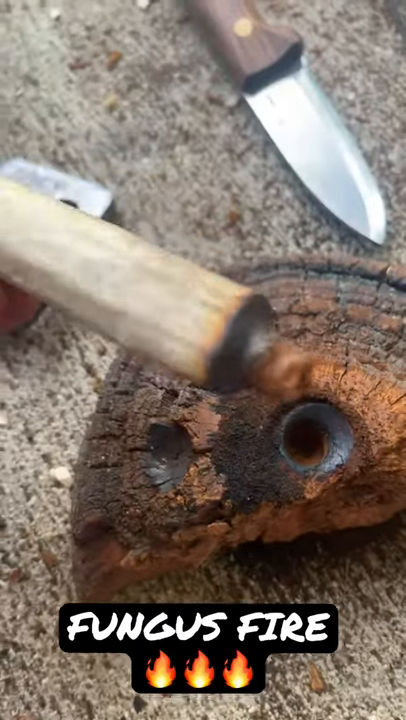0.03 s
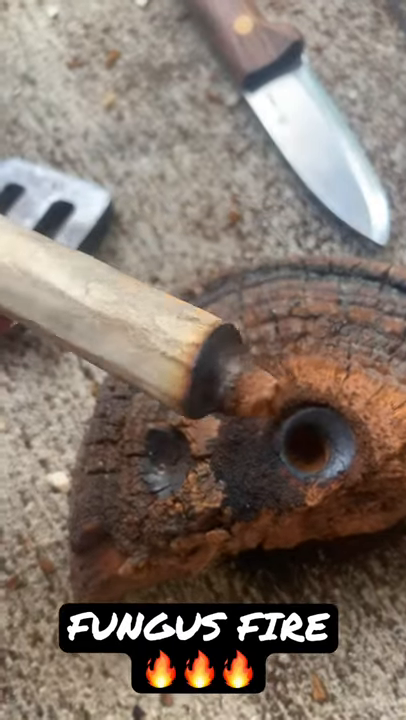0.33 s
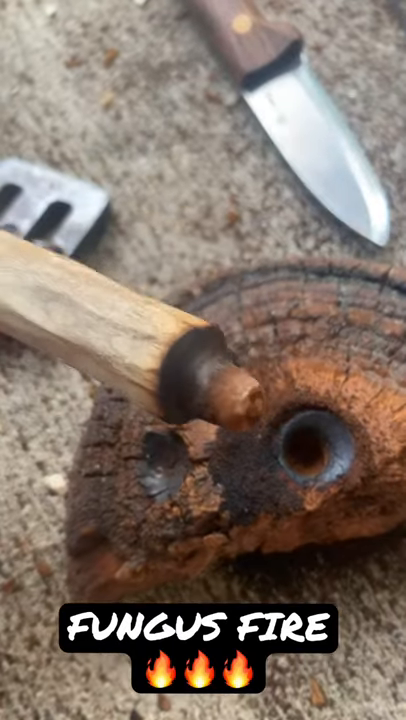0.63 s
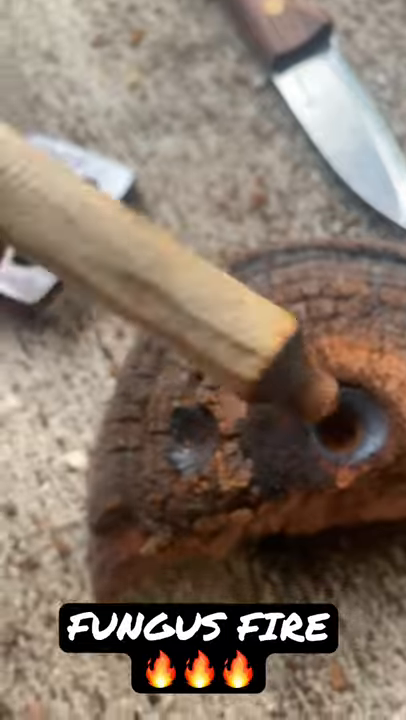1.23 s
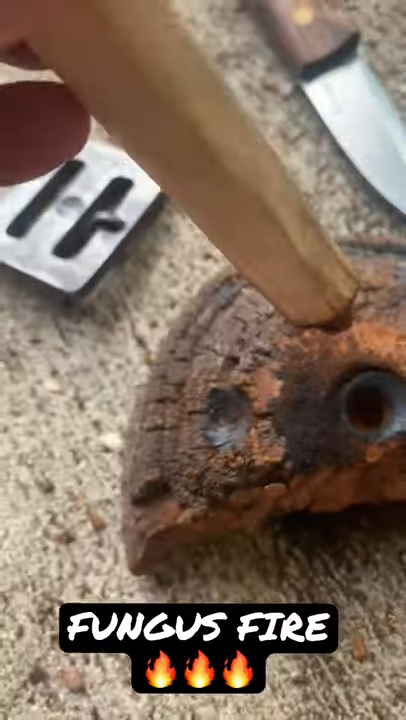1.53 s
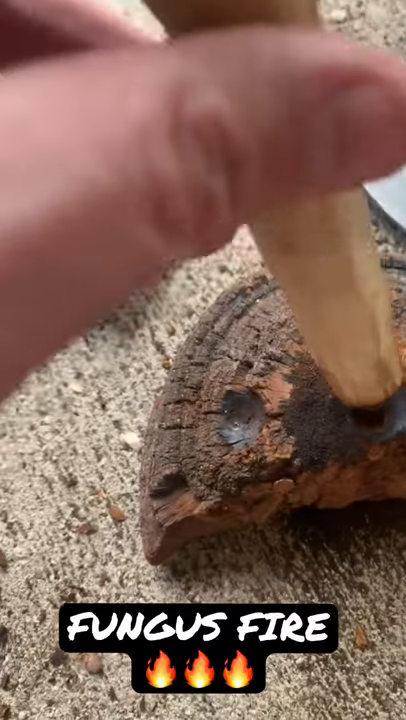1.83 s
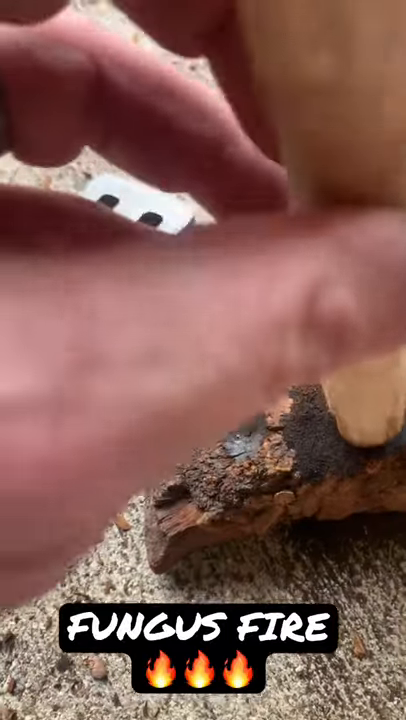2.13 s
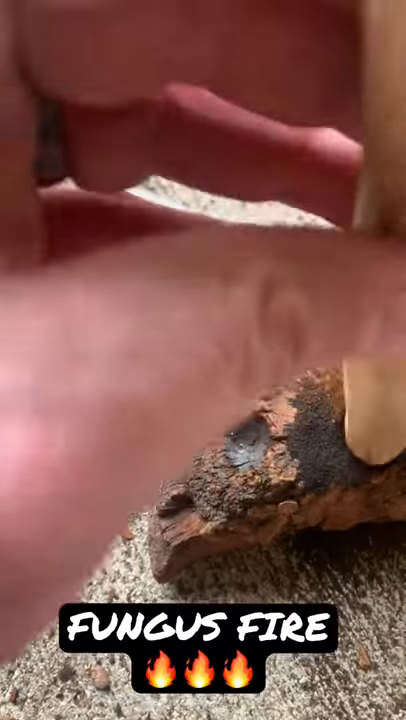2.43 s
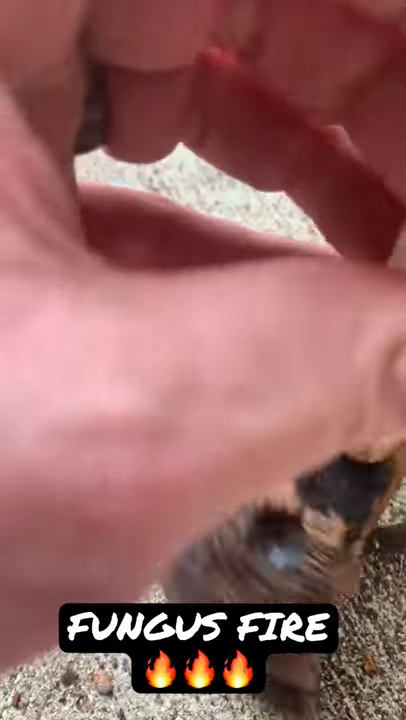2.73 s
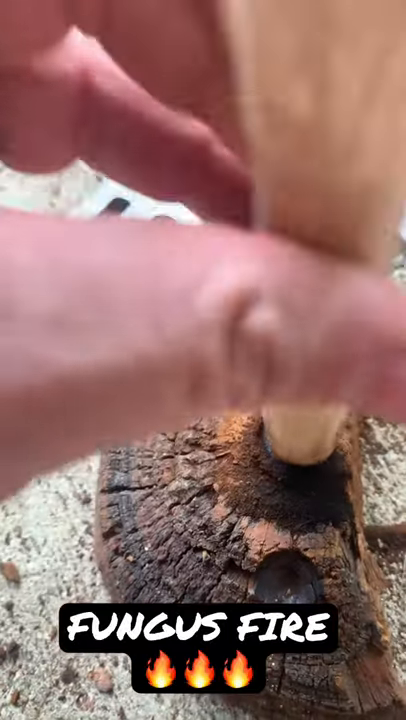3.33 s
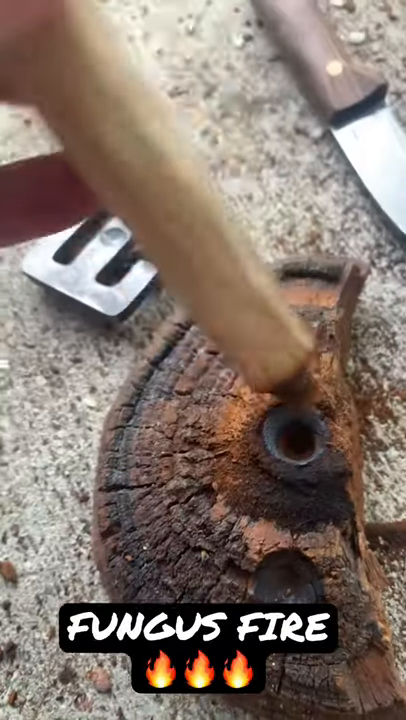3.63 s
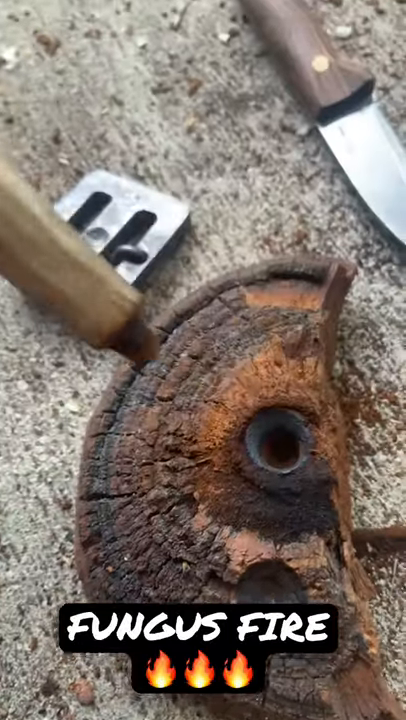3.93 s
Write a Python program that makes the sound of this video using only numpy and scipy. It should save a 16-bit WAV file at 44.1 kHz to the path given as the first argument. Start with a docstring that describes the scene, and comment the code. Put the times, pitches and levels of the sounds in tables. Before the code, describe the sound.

Outdoors, faint traffic rumbles; then a wooden spindle, twisted by hand close up, rasps unevenly in a dry fungus socket with small snaps of char and light knocks. The scraping stops and the far traffic grows a little louder.

```python
"""A wooden spindle twisted by hand in the charred socket of a dry bracket fungus, close to the microphone.
Each twist is a dry scrape that rings the spindle; crumbs of char snap and the tip knocks in the socket.
The fungus lies on concrete; just above it, fingers whisper along the wood and the hands bump softly.
Far behind, traffic rumbles and swells at the end, with a very faint high whine. Heard in stereo."""
import sys
import numpy as np
from scipy import signal
from scipy.fft import rfft, irfft
from scipy.io import wavfile
from scipy.ndimage import uniform_filter1d, map_coordinates

SR = 44100
rng = np.random.default_rng(int(sys.argv[2]) if len(sys.argv) > 2 else 0)


def digitize_waveform(pressure):
    """Quantize a signal to 16-bit integers and store it at the path in sys.argv[1].

    Rows of a 2-D input are taken as channels; values are limited to [-1, 1].
    """
    field = np.atleast_2d(pressure).T
    bounded = np.clip(field, -1, 1)
    quanta = np.round(bounded * 32767).astype(np.int16)
    wavfile.write(sys.argv[1], SR, quanta)


N = 176400
T, HZ = np.arange(N) / SR, np.fft.rfftfreq(N, 1 / SR)


def amp(db):
    """Decibels to gain."""
    return 10 ** (np.asarray(db) / 20)


def unit(x):
    """Scales to rms 1."""
    return x / np.sqrt(np.mean(abs(x) ** 2) + 1e-30)


def read(points, hz):
    """Reads a table on a log-frequency axis."""
    f, value = np.transpose(points)
    return np.interp(np.log(hz + 1), np.log(f + 1), value)


def wander(rate_hz):
    """Random drift of rms 1, mostly slower than rate_hz."""
    return unit(irfft(rfft(rng.standard_normal(N)) / (1 + (HZ / rate_hz) ** 4), N))


def pair(a, b, likeness):
    """Left and right from two independent noises, correlated by likeness."""
    likeness = np.clip(likeness, 0, 1)
    return np.array([a, likeness * a + np.sqrt(1 - likeness ** 2) * b])


def mode(f, hz, width_hz):
    """Response of one resonance, gain 1 at its centre."""
    return 1j * f * width_hz / (hz ** 2 - f ** 2 + 1j * f * width_hz)


def tone(hz, width_hz):
    """A wavering tone of rms 1."""
    phase = 2 * np.pi * hz * T
    return unit(wander(width_hz) * np.cos(phase) + wander(width_hz) * np.sin(phase))


def whine():
    """A very faint, wavering whine in the background."""
    return amp(-89.5) * tone(3490, width_hz=6)


# Spectral shape of the distant street: f/Hz, relative density/dB
STREET_SPECTRUM = [(20, -20), (35, -16.5), (62, 0.5), (130, -1.93), (250, -1.5), (345, -6.5), (395, -18),
                   (560, -16.5), (750, -20.5), (1150, -20.5), (2400, -34.5), (3500, -37), (5300, -37.5),
                   (8000, -52), (12000, -56.5), (14000, -65.5), (16000, -86)]
# Left-right likeness of the street at the microphone: f/Hz, correlation/0-1
STREET_LIKENESS = [(20, 0.67), (60, 0.91), (120, 0.99), (340, 0.98), (520, 0.21), (850, 0.8), (1200, 0.29),
                   (2400, 0.5), (3500, 0.91), (4700, 1), (5800, 1), (16000, 1)]
# Far engine tones: f/Hz, level/dB against the rumble noise
ENGINE_TONES = [(67, -14), (111.5, -8), (322, -17), (354, -20)]
# Rise and fall of the far traffic: t/s, rumble level/dB, tyre roar level/dB
TRAFFIC_LEVELS = [(0, -52.5, -59.5), (.3, -48.5, -61.5), (.55, -47, -61), (1.0, -50, -62),
                  (1.18, -47.5, -61), (1.4, -47.5, -61), (1.6, -50.5, -61), (2.2, -50, -61.5),
                  (2.7, -50.5, -61.5), (3.3, -52, -61.5), (3.48, -49.5, -57.5), (3.63, -44, -57),
                  (3.87, -43, -53), (4.0, -42, -53)]
def traffic():
    """Far off: rumble with faint engine tones, tyre roar and thin hiss, swelling as a vehicle nears."""
    crossover_hz, hiss_hz, hiss_swell_share, patch_db = 440, 3000, 0.78, 2
    frames, f = N // 512 + 5, np.fft.rfftfreq(2048, 1 / SR)
    re_a, im_a, re_b, im_b, patches = rng.standard_normal((frames, len(f), 5)).T
    # the level drifts in small patches of time and frequency
    patches = unit(uniform_filter1d(uniform_filter1d(patches, size=12, axis=0), size=8, axis=1))
    cells = pair(re_a + 1j * im_a, re_b + 1j * im_b, read(STREET_LIKENESS, f)[:, None])
    noise = signal.istft(cells * amp(patch_db * patches), nperseg=2048, noverlap=1536)[1][:, :N]
    street = rfft(noise) * amp(read(STREET_SPECTRUM, HZ))
    lowpass = 1 / (1 + (HZ / crossover_hz) ** 8)
    highpass = 1 - 1 / (1 + (HZ / hiss_hz) ** 2)
    rumble = unit(irfft(street * lowpass, N))
    rumble += sum(amp(db) * tone(hz, width_hz=3.96) for hz, db in ENGINE_TONES)
    roar = unit(irfft(street * (1 - lowpass), N))
    hiss = irfft(rfft(roar) * highpass, N)
    times, *levels = np.transpose(TRAFFIC_LEVELS)
    rumble_db, roar_db = (np.interp(T, times, db) for db in levels)
    hiss_db = roar_db[0] + hiss_swell_share * (roar_db - roar_db[0])
    return rumble * amp(rumble_db) + (roar - hiss) * amp(roar_db) + hiss * amp(hiss_db)


# Fingers sliding along the spindle, close up: centre t/s, half length/s, level/dB
FINGER_SLIDES = [(0.11, 0.19, -84), (.85, 0.052, -88), (1.174, 0.16, -84), (3.542, 0.18, -77.5)]
def finger_slides():
    """Dry skin on wood: a very faint, high, uneven whisper."""
    whisper = irfft(rfft(rng.standard_normal(N)) * mode(HZ, 13350, width_hz=1500) ** 2, N)
    whisper = unit(whisper * amp(4 * wander(rate_hz=34.8)))
    return whisper * sum(amp(db) * np.exp(-((T - s) / half) ** 2) for s, half, db in FINGER_SLIDES)


# Soft bumps of the hands near the microphone: centre t/s, peak level/dB, f/Hz, half length/s
HAND_BUMPS = [(2.107, -43, 58, 0.012), (2.334, -39.5, 58, 0.014), (2.491, -41.5, 71, 0.012),
              (2.751, -36, 79.5, 0.011), (2.863, -39, 74, 0.014)]
def hand_bumps():
    """A few low cycles as the hands shift their grip."""
    out = np.zeros(N)
    for centre, db, hz, half in HAND_BUMPS:
        envelope = amp(db) * np.exp(-((T - centre) / half) ** 2)
        out += envelope * np.cos(2 * np.pi * (hz * (T - centre) + rng.random()))
    return out


# Knocks in the socket, close up: t/s, peak level/dB, f/Hz, rise/s, decay/s
SOCKET_KNOCKS = [(2.8124, -42.5, 1140, 0.0011, 0.00042), (3.2422, -49.5, 1260, 0.0062, 0.011),
                 (3.262, -55, 1170, 0.0026, .002)]
def socket_knocks():
    """The tip shifts in the socket: a short hollow note."""
    out = np.zeros(N)
    for start, db, hz, rise, decay in SOCKET_KNOCKS:
        t = np.maximum(T - start, 0)
        envelope = np.minimum(t / rise, 1) * np.exp(-np.maximum(t - rise, 0) / decay)
        out += amp(db) * envelope * np.sin(2 * np.pi * hz * t)
    return out


# Higher modes of the spindle: f/Hz, nominal width/Hz, relative level/dB
WOOD_MODES = [(3175, 150, 7), (4660, 1200, -9), (5400, 200, 9.5), (7050, 760, 3), (8070, 260, 4),
              (9350, 120, 2), (9600, 480, 8.5), (10540, 430, 2.5), (11520, 250, -6), (13400, 670, 1),
              (14000, 570, 0), (15830, 370, 6.5)]
# Dry hiss where the tip meets the char: f/Hz, relative density/dB
CONTACT_SPECTRUM = [(300, -33), (900, -6.5), (1800, 1), (2400, -11), (3700, -3.5), (6200, -1.5),
                    (9000, -15), (11200, -8), (13500, -2), (16000, -5)]
def wood(f):
    """Minimum-phase response of the wood's higher modes and the dry contact."""
    mode_power = sum(abs(amp(db) * mode(f, hz, width) ** 2.2) ** 2 for hz, width, db in WOOD_MODES)
    log_gain = np.log(amp(read(CONTACT_SPECTRUM, f)) ** 2 + mode_power) / 2
    mirrored = np.r_[log_gain, log_gain[-2:0:-1]]
    return np.exp(np.conj(signal.hilbert(mirrored)))[:len(f)]


# Char snapping in the socket, close up: t/s, level/dB (energy spread over 2 ms), relative spindle ring/dB
CHAR_SNAPS = [(1.848, -68, -6), (1.9275, -76, -15), (1.955, -62, -3), (2.259, -66, -15), (2.389, -58, -8),
              (2.419, -62, -15), (2.583, -77, -20), (2.619, -60.5, -20), (2.668, -70, -15),
              (2.684, -63.5, -23), (2.723, -60, -20), (2.767, -54, -8), (2.783, -50, -17), (2.791, -57, -6),
              (2.802, -54, -20), (2.827, -59, -6), (2.868, -53, -10), (2.871, -57, -4), (2.882, -63, -15),
              (2.920, -68, -15), (2.992, -62, 0), (3.016, -67, -12), (3.035, -64, -14), (3.045, -61, -12),
              (3.106, -66, -12), (3.169, -62, -2), (3.186, -55.5, -2), (3.2531, -41.5, -15),
              (3.266, -52, -8), (3.268, -64, 3), (3.283, -60, -10), (3.309, -59, -10), (3.329, -60, -8)]
def char_snaps():
    """A crumb breaks: a click and a millisecond of crumbling through the wood, ringing the spindle."""
    crumble_decay_s, level_span_s, dull_hz = .0008, .002, 11100
    out, size = np.zeros((2, N)), 2 ** 11
    f, t = np.fft.rfftfreq(size, 1 / SR), np.arange(size) / SR
    treble_ring = 1 + amp(3) * mode(f, 10500, width_hz=1600)
    colour = unit(wood(f) * treble_ring / (1 + 1j * f / dull_hz) ** 2)
    spindle = unit(mode(f, 2950, width_hz=300))
    for start, db, ring_db in CHAR_SNAPS:
        at = round(start * SR)
        push = (t == 0) + .2 * rng.standard_normal(size) * np.exp(-t / crumble_decay_s)
        click = irfft(rfft(push) * (colour + amp(ring_db) * spindle))
        out[:, at:at + size] += amp(db) * np.sqrt(level_span_s * SR) * click / np.linalg.norm(click)
    return out


def tip_friction():
    """Char grains catch over a smooth rub; the hand slips unevenly and coarser grit roughens it."""
    grains_per_s, grain_spread_db, grit_per_s, grit_decay_s = 3800, 3, 55, 0.00076
    grains = rng.choice([-1, 1], N) * amp(grain_spread_db * np.minimum(rng.exponential(1, N), 4))
    grains *= rng.random(N) < grains_per_s / SR
    rub = amp(0.5) * rng.standard_normal(N)
    friction = pair(unit(unit(grains) + rub), rng.standard_normal(N), likeness=.94)
    catches = np.minimum(rng.exponential(1, N), 2) * (rng.random(N) < grit_per_s / SR)
    grit = signal.lfilter([1], [1, -np.exp(-1 / (grit_decay_s * SR))], catches)
    judder = amp(-0.26 * wander(rate_hz=130))
    return unit(friction * judder * (1 + amp(-0.5) * grit))


# Twists of the spindle, right at the microphone; ring levels are relative to the rasp:
# t/s, length/s, drive level/dB, swell/dB, first ring f/Hz, level/dB, half-width/Hz,
# second ring f/Hz, level/dB, third ring f/Hz, socket ring level/dB, tilt/dB per octave, ring glide/share
SPINDLE_TWISTS = [ (1.923, 0.046, -74, -5, 2750, -15, 220, 5310, 3, 8300, -6, -1, 0.017),
                  (1.978, 0.044, -73, -5, 3140, -16, 90, 5400, -9, 9200, -16, 1, -0.0042),
                  (2.184, 0.071, -68, 21.5, 2730, -1, 70, 5400, -14, 9300, -14, -3, 0),
                  (2.253, 0.075, -60, 1, 2750, -4.5, 85, 5580, -8, 10100, -11, -1.5, 0.012),
                  (2.329, 0.058, -60.5, 1, 2990, -3, 100, 5270, -5, 10230, -5.5, 1, 0.016),
                  (2.392, 0.038, -73.5, -13, 3050, -9, 120, 5270, -4, 10300, 2.5, 2, -0.0099),
                  (2.42, 0.23, -78, 6, 2850, -21, 200, 5400, -10, 12600, -11, 4, -0.011),
                  (2.656, 0.084, -65.5, 4, 2750, -27, 200, 5300, -30, 12300, -7, 4.5, 0.012),
                  (2.745, 0.02, -58.5, 8, 2820, -12, 170, 5700, -19, 11700, -13, -2.5, 0),
                  (2.764, 0.037, -52.5, 0, 2660, -10, 330, 5550, -23, 12000, -14, 4, 0.0085),
                  (2.811, 0.044, -57.5, -6, 2700, -6, 260, 5440, -23, 9640, -11, 2.5, -0.025),
                  (2.86, 0.13, -70.5, 1, 2950, -6.5, 230, 5400, -20, 10200, -6, 1.5, 0),
                  (2.987, 0.049, -66, 7, 3000, -9, 170, 6930, -9, 10200, -9, 6, 0.0093),
                  (3.038, .028, -61.5, -2, 3040, -6.5, 170, 6970, -10, 9950, -5, 0.5, -0.0052),
                  (3.068, 0.081, -70.5, -2, 3060, -14, 150, 5340, -22, 9700, -10, -3.5, -0.0039),
                  (3.162, 0.015, -63, -3, 2970, -4, 220, 5300, -8, 9900, -3.5, 3, 0),
                  (3.177, 0.039, -59, 1, 3040, -4, 120, 5440, -14, 10100, -5.5, -1.5, -0.0047),
                  (3.212, 0.02, -55, 4, 3030, -2.5, 110, 5220, -11, 10150, -6.5, -1, 0.022),
                  (3.233, 0.022, -52, -6, 2960, -10, 240, 5050, 0, 10400, -10, -1.5, 0.0044),
                  (3.253, 0.025, -54, 2, 2750, -2, 110, 5400, -10, 11900, -19, -2.5, 0.0068),
                  (3.274, 0.016, -57, -2, 2950, -5, 380, 5290, 0, 12000, -12, 6, 0),
                  (3.293, 0.054, -67.5, -10, 3090, 0.5, 170, 5120, -14, 12100, -23, 3, -0.0014)]
def spindle_twists():
    """The turning tip excites the wood, the socket and three rings that shift and glide with the grip."""
    attack_s, release_s, dense_ring_decay_s, dense_ring_db = 0.0083, 0.0044, 0.011, 3.5
    second_half_hz, third_half_hz, third_db = 90, 270, -7
    socket_hz, socket_half_hz = 1320, 200
    lean_db = np.array([[-1.75], [1.75]])  # the first ring and the socket sit to the right
    out, size = np.zeros((2, N)), 2 ** 14
    f, t = np.fft.rfftfreq(size, 1 / SR), np.arange(size) / SR
    friction, body = tip_friction(), wood(f)
    for (start, length, db, swell_db, first_hz, first_db, first_half_hz,
         second_hz, second_db, third_hz, socket_db, tilt_db, glide) in SPINDLE_TWISTS:
        at = round(start * SR)
        progress = np.minimum(t / length, 1) - .5
        envelope = np.minimum(t / attack_s, 1) * np.exp(-np.maximum(t - length, 0) / release_s)
        drive = rfft(friction[:, at:at + size] * envelope * amp(db + swell_db * progress))
        # a short, dense ring of the spindle's many narrow modes, drawn at random for each twist
        dense_ring = rng.standard_normal(size) * np.exp(-t / dense_ring_decay_s)
        narrow_modes = 1 + amp(dense_ring_db) * rfft(dense_ring / np.linalg.norm(dense_ring))
        tilt = amp(tilt_db * np.log2(f / first_hz + 0.12))
        rasp = irfft(drive * unit(body * narrow_modes * tilt))
        rings = [(first_hz, first_half_hz, first_db + lean_db),
                 (second_hz, second_half_hz, second_db),
                 (third_hz, third_half_hz, third_db),
                 (socket_hz, socket_half_hz, socket_db + lean_db)]
        response = sum(amp(ring_db) * unit(mode(f, hz, 2 * half) ** 2) for hz, half, ring_db in rings)
        ringing = irfft(drive * response)
        positions = np.cumsum(1 + glide * progress)  # a changing read speed bends the pitch
        gliding = np.array([map_coordinates(side, [positions]) for side in ringing])
        out[:, at:at + size] += rasp + gliding
    return out


def scene():
    """The handwork close to the microphone, the street far behind."""
    handwork = spindle_twists() + char_snaps() + socket_knocks() + finger_slides() + hand_bumps()
    return handwork + traffic() + whine()


# Phase between the two microphone ports: f/Hz, lead of the left/rad
PORT_PHASE = [(0, 0), (430, -.1), (650, -2.5), (1000, -.6), (1700, .6), (3700, 1.6), (4700, 3.14),
              (7000, 6.2), (11100, 12.5), (16000, 20)]
def record(dry):
    """The microphone's two ports hear the sound slightly apart; then soft ends and the band limit."""
    fade_s, cutoff_hz = .004, 15850
    lead = np.interp(HZ, *np.transpose(PORT_PHASE))
    ported = irfft(rfft(dry) * np.exp(.5j * np.array([lead, -lead])), N)
    fade = np.minimum(np.minimum(T, T[::-1]) / fade_s, 1)
    lowpass = signal.firwin(511, cutoff_hz, window=("kaiser", 9), fs=SR)
    return signal.oaconvolve(ported * fade, lowpass[None], "same")


dry = scene()
out = record(dry)
digitize_waveform(out)
```